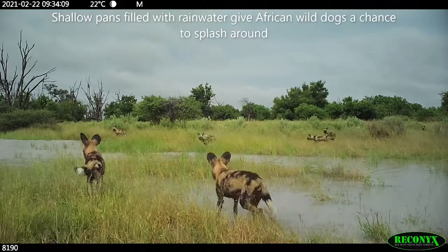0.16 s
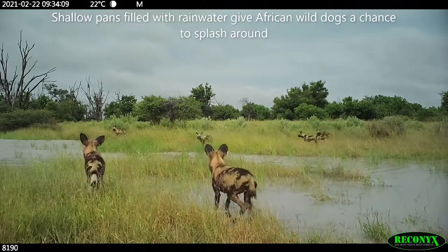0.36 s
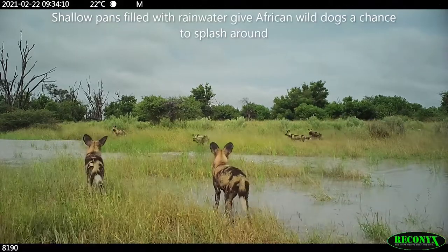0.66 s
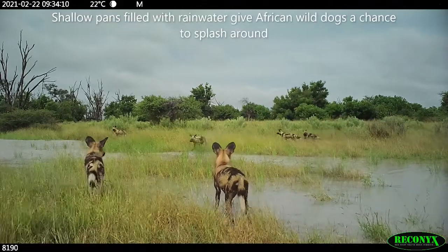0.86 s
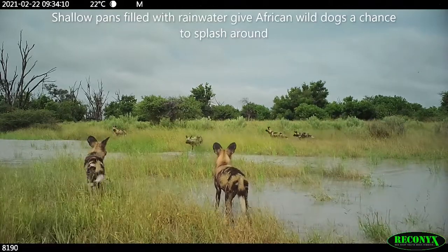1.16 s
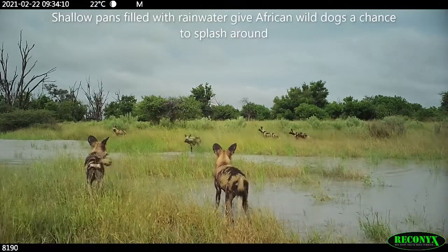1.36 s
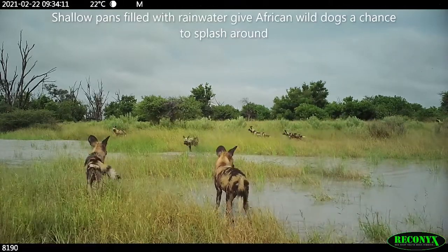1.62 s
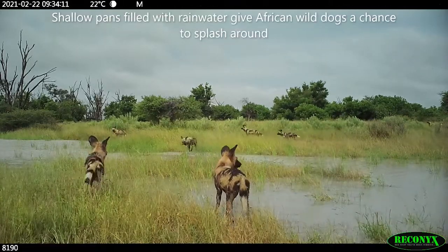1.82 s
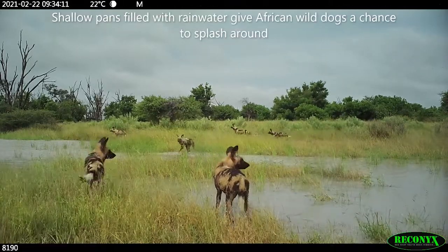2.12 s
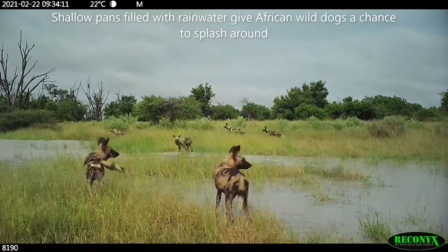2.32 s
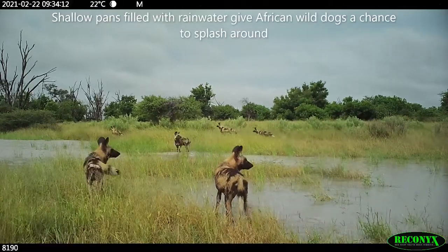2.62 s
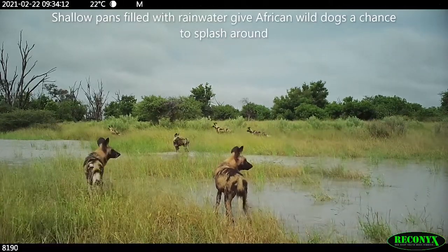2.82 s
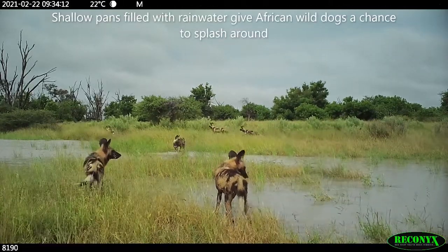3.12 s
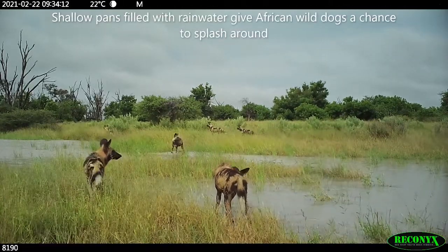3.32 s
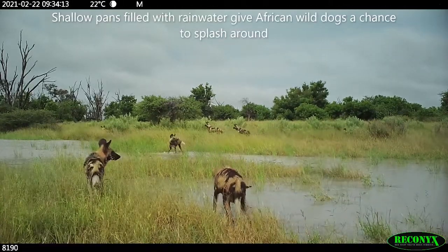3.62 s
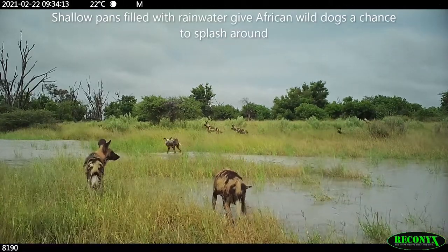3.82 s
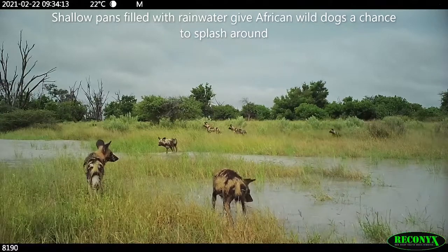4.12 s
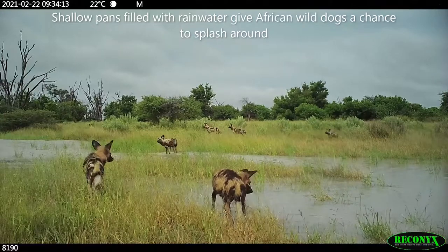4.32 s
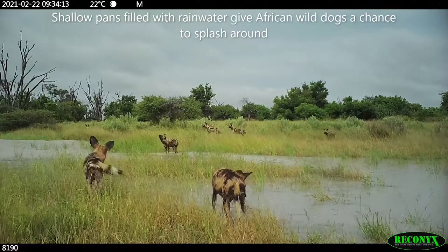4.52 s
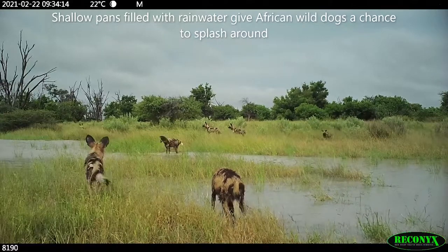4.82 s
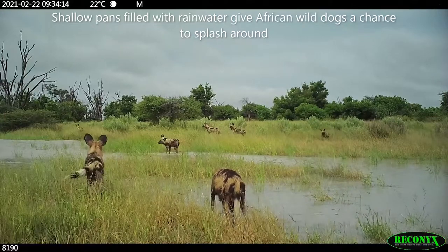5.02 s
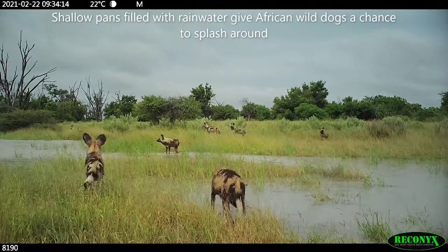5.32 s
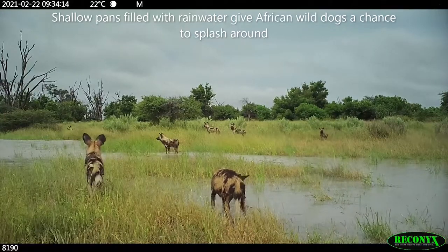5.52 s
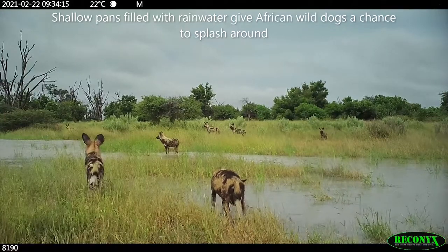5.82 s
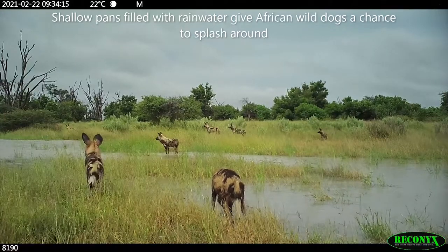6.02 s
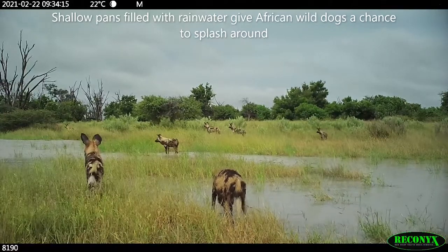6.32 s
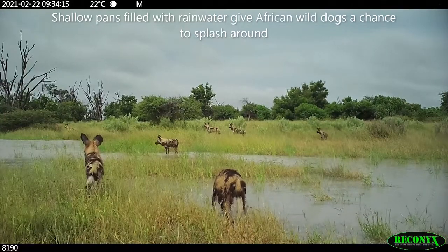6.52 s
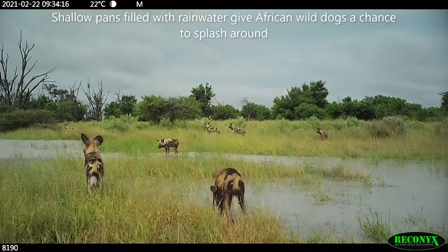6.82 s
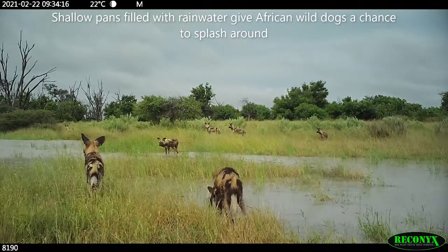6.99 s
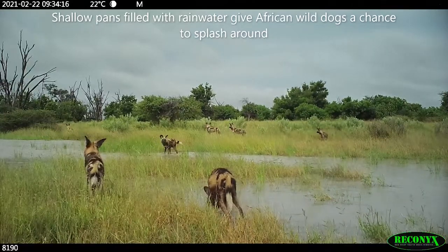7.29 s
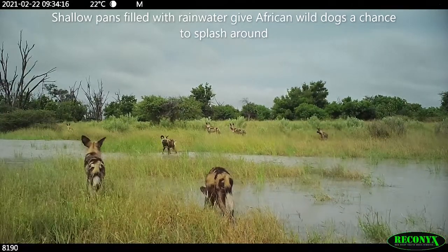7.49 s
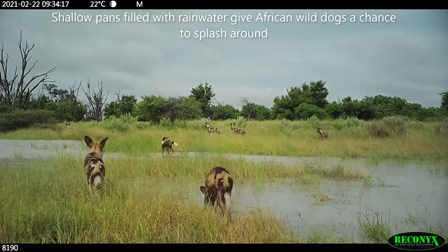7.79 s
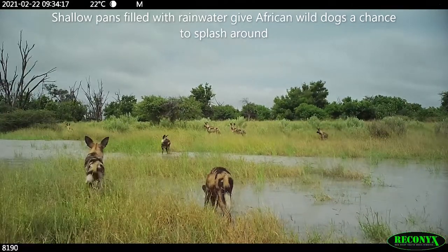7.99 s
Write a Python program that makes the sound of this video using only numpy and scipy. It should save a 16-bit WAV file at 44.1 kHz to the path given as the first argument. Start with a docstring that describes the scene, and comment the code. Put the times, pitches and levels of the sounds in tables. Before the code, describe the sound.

A wind thump hits the microphone at once, then a close, hoarse bird-like caller begins a high chip followed by a quick slur, repeated about every 0.7 seconds. Thin whistles glide faintly behind. Small splashes and snaps come from animals wading in wet grass. Calls are strongest in the first half and become fainter and more diffuse. Low breeze and grassy hiss continue; nearly everything is in the left channel.

```python
"""A gust thumps the housing of a trail camera, then a hoarse voice close by starts to repeat a chip and a slur.
The place is a flooded grassy pan; the camera's one microphone feeds the left channel.
The caller, most likely a bird, is a rough harmonic voice; thin whistles behind it are gliding near-sines.
Wind on the port is shaped noise with single pressure pulses; wading wild dogs throw bursts of spray
and ringing bubbles. A low rush follows the breeze, a high grassy hiss varies separately, over circuit hiss."""
import sys
import numpy as np
from scipy import signal
from scipy.fft import rfft, irfft, next_fast_len
from scipy.io import wavfile
from scipy.ndimage import uniform_filter1d, map_coordinates

SR = 44100
rng = np.random.default_rng(int(sys.argv[2]) if len(sys.argv) > 2 else 0)


def output_pcm(signal):
    """Save a mono or channel-first signal as 16-bit PCM at the path in sys.argv[1].

    Samples are clipped to [-1, 1] before scaling.
    """
    pcm = np.clip(np.atleast_2d(signal).T, -1, 1) * 32767
    wavfile.write(sys.argv[1], SR, np.round(pcm).astype(np.int16))


N = 359415
TIME = np.arange(N) / SR
CUTOFF_HZ = 15200  # top of the microphone channel

# Levels are relative within each table; the functions trim them. Spectra: freq_hz, level_db.
# Short arched chips of the caller: crest_s, crest_pitch_hz, level_db, roughness (0-1), fundamental_lift_db
CHIP_CALLS = [(0.175, 3000, -36, 1.0, -4), (0.83, 3136, -32.5, 0.64, -3), (1.418, 3556, -28, 0.6, -1),
              (2.063, 3285, -38, 1, 6.5), (2.698, 3450, -29.5, 0.49, 0.5), (3.394, 3320, -35.5, 0.85, 6.5),
              (4.18, 2690, -36.5, 0.54, 4.5), (4.912, 3000, -39, 0.43, 10), (5.591, 3020, -35, 0.28, -3),
              (6.166, 2900, -44, 0.6, 1), (6.704, 2950, -47.5, 0.5, 5), (7.275, 3000, -45, 0.54, 3.5),
              (7.834, 2945, -51, 0.25, 16)]
# The slur after each chip: crest_s, crest_pitch_hz, level_db, rise_s, swell_db, crest_to_sag_s, sag_pitch_hz,
# crest_to_end_s, end_pitch_hz, end_loss_db, roughness (0-1), fundamental_lift_db, tilt_db_per_octave
SLUR_CALLS = [(0.35, 2427, -40.5, 0.053, 15, .008, 2380, .016, 2350, 9, 0.6, 2.5, -0.5),
              (0.961, 3193, -28.5, .028, 26, 0.047, 2906, 0.072, 2990, 5, 0.32, 1.5, 3),
              (1.552, 3040, -29, .026, 28, .022, 2542, 0.073, 3060, -1.5, 0.4, -9.5, -4.5),
              (2.202, 3500, -24, .023, 26, 0.038, 3060, 0.07, 3250, 4.5, 0.4, 0.5, 4),
              (2.834, 2780, -27, 0.027, 30, 0.022, 2474, 0.086, 2767, 9.5, 0.45, 0.5, 2),
              (3.539, 2824, -28, 0.028, 28, 0.042, 2467, 0.09, 2510, 3, .5, 4.5, 5.5),
              (4.323, 2483, -36.5, 0.023, 27, 0.034, 2100, 0.099, 2290, 7.5, 0.55, 3, -1.5),
              (5.064, 3006, -37.5, 0.03, 14.5, .044, 2247, .086, 2870, 7.5, 0.48, 14.5, 3.5),
              (5.739, 3290, -35.5, .023, 18, 0.053, 2910, 0.092, 3240, 3.5, 0.39, -2.5, -1),
              (6.308, 3196, -38.5, 0.03, 24, 0.039, 2880, 0.09, 3080, 12.5, 0.5, 4.5, 4.5),
              (6.848, 3155, -37.5, 0.03, 26, .032, 2873, 0.078, 3050, 7, 0.27, 6, 4.5),
              (7.42, 3053, -44.5, .034, 29, 0.035, 2815, 0.064, 2870, 3, 0.4, 3, 1.5),
              (7.99, 3050, -45.5, 0.036, 22, 0.039, 2480, 0.072, 3040, 12, 0.3, 7, -2)]
# Resonances of throat and beak: freq_hz, gain_db
THROAT_GAIN = [(1200, 9.5), (2200, -6), (3100, -7), (4400, 6.5), (6200, 4.5), (7200, 6.5), (8400, -10),
               (10000, -20.5), (14000, -41)]
# Breathy rasp in the calls: freq_hz, level_db
RASP_SPECTRUM = [(1000, -2.5), (2300, -11), (3200, 0), (4500, 6.5), (6500, 13.5), (8000, 6.5),
                 (10000, -6.5), (15000, -37)]
# Share of the caller scattered by the reeds: time_s, scattered_over_direct_db
REED_SCREENING = [(0, -3), (.8, -12), (3.6, -6), (4.3, -5), (5.7, -5), (6.3, -3), (8.15, 11)]
# Thin whistles, one list per note: time_s, pitch_hz, level_db
WHISTLE_NOTES = [
    [(0.12, 9550, -64), (0.16, 9230, -45), (0.2, 8830, -59), (0.24, 8250, -56), (0.275, 7950, -40),
     (0.305, 7600, -54), (0.345, 8140, -42), (0.38, 8140, -49), (0.405, 8750, -64)],
    [(2.16, 6040, -45), (2.23, 5100, -53), (2.28, 4880, -45), (2.325, 4500, -55)],
    [(3.04, 6950, -51), (3.062, 6750, -47), (3.078, 7140, -36), (3.105, 7540, -69)],
    [(3.805, 7330, -63), (3.818, 6430, -41), (3.83, 6300, -49), (3.843, 6940, -42), (3.885, 6950, -41),
     (3.91, 7030, -38), (3.935, 7200, -57), (3.972, 7440, -53)],
    [(6.545, 5740, -65), (6.585, 5500, -51), (6.62, 5230, -50), (6.66, 4930, -54), (6.71, 4930, -52),
     (6.76, 4790, -41), (6.82, 4775, -44.5), (6.835, 5160, -51)],
    [(7.46, 5590, -58), (7.52, 5625, -43), (7.57, 5740, -48), (7.615, 5380, -48), (7.675, 5130, -57),
     (7.71, 5900, -49), (7.75, 6450, -55)],
]
# Gusts on the housing: peak_s, half_width_s, level_db
HOUSING_GUSTS = [(0.057, 0.017, -23), (0.24, .05, -42), (0.56, 0.034, -26.5), (0.8, 0.032, -34),
                 (0.955, 0.015, -30), (1.09, 0.027, -27.5), (1.2, .06, -46), (1.615, .025, -34.5),
                 (2.06, 0.081, -39), (2.52, 0.013, -50), (2.815, 0.03, -40), (3.385, 0.018, -43),
                 (3.475, 0.012, -39), (3.55, 0.017, -36.5), (3.72, 0.079, -49.5), (4.265, 0.052, -38.5),
                 (4.58, 0.013, -50), (4.76, 0.012, -41), (5.09, 0.046, -52), (5.7, .05, -43.5),
                 (5.871, 0.012, -28), (5.98, 0.034, -37.5), (6.145, 0.016, -48), (6.395, 0.017, -34),
                 (6.51, 0.025, -39.5), (6.595, 0.021, -35.5), (6.83, 0.022, -32), (6.9, 0.024, -33),
                 (7.09, 0.058, -39.5), (7.245, 0.034, -36), (7.5, .02, -42), (7.565, .025, -40.5),
                 (7.721, 0.022, -32.5), (8.078, 0.015, -33.5)]
# Single eddies that thump the port: time_s, peak_db, pitch_hz (sets the width of the pulse)
PORT_THUMPS = [(0.056, -13.5, 244), (0.067, -16, 179), (.541, -19.5, 280), (.81, -25, 150),
               (1.067, -23, 220), (1.635, -23.5, 139), (2.07, -28.5, 129), (3.475, -32, 130),
               (4.272, -33, 158), (5.871, -20, 111), (6.009, -19, 140), (6.396, -27, 220),
               (6.599, -18, 90.5), (7.711, -17.5, 121), (8.082, -28, 110)]
# Strength of the breeze: time_s, level_db
BREEZE_STRENGTH = [(0, -58.5), (.35, -55.5), (.7, -58), (1.4, -55.5), (1.65, -60.5), (2.0, -60.5),
                   (2.3, -65), (2.9, -65.5), (3.25, -62), (3.6, -62.5), (4.1, -60), (4.35, -64), (5.2, -66),
                   (5.7, -59), (6.1, -62.5), (6.9, -60.5), (7.42, -57), (8.15, -64)]
# Turbulence on the port: freq_hz, level_db
BUFFET_SPECTRUM = [(20, 8.5), (60, 4), (110, 0.5), (180, -3), (290, -11), (450, -24.5), (900, -32.5),
                   (2000, -72)]
# Steady low rumble of the air: freq_hz, level_db
RUMBLE_SPECTRUM = [(20, -3.5), (45, -1.5), (90, -5), (160, -34), (400, -39)]
# Small splashes and snaps in the wet grass: start_s, level_db
SPLASH_HITS = [(0.0189, -42), (0.034, -36), (0.41, -37), (0.478, -42.5), (0.5018, -62), (1.159, -41),
               (1.6786, -44.5), (1.722, -44), (1.9177, -43.5), (1.9659, -46), (3.1497, -44),
               (3.2354, -46.5), (5.412, -43), (6.4607, -46.5), (6.5959, -47), (6.9573, -44.5),
               (7.1288, -33), (7.1811, -42.5), (7.2555, -37), (7.5744, -45), (7.9134, -49), (8.099, -44)]
# Spray of droplets: freq_hz, level_db
SPLASH_SPECTRUM = [(800, -15), (1800, -0.5), (3500, -10.5), (6000, 4), (8500, -2), (14000, -25.5)]
# Bubbles under the paws: start_s, starting_pitch_hz, level_db
BUBBLES = [(3.233, 926, -36), (3.725, 1600, -44), (8.094, 1680, -41)]
# Low rush of the breeze: freq_hz, level_db
RUSH_SPECTRUM = [(30, -0.5), (200, -0.5), (400, 3), (800, 3), (1300, -5), (2500, -17), (5000, -24),
                 (12000, -35)]
# High hiss in the grass: freq_hz, level_db
GRASS_SPECTRUM = [(1500, -3.5), (3200, -7), (5000, -4.5), (6000, -6), (7000, 1), (8200, -10), (10000, -12),
                  (15000, -31)]
# Strength of that hiss: time_s, level_db
GRASS_STRENGTH = [(0, -53.5), (.35, -55), (.8, -61), (1.5, -62.5), (1.8, -59.5), (2.6, -60.5), (2.95, -58),
                  (3.25, -62.5), (3.7, -60), (4.0, -64), (5.5, -62), (7.0, -60), (8.15, -59)]
# Circuit hiss: freq_hz, level_db
CIRCUIT_SPECTRUM = [(20, 6.5), (70, 22.4), (140, 14.4), (240, 9), (350, 9.7), (1000, 7.4), (6000, 3.6),
                    (15000, 1.3)]


def caller():
    """One hoarse voice close by sings pairs of notes: a chip, then a slur."""
    out, rasp = np.zeros(N), coloured(RASP_SPECTRUM)
    for crest_s, hz, db, rough, lift_db in CHIP_CALLS:
        gesture = chip(crest_s, hz, db)
        add(out, *hoarse_note(*gesture, rough, lift_db, 0, rasp))
    for *settings, rough, lift_db, tilt_db in SLUR_CALLS:
        gesture = slur(*settings)
        add(out, *hoarse_note(*gesture, rough, lift_db, tilt_db, rasp))
    return out


def chip(crest_s, hz, db, rise_s=0.018, fall_s=0.024, start_share=0.54,
         attack_s=0.0135, decay_s=0.014, crest_db=2, squareness=1.66):
    """One short arch of pitch; the level falls away on both sides of the crest."""
    t = np.arange(-2.5 * attack_s, 3 * decay_s, 1 / SR)
    arch = np.exp(-(t / np.where(t < 0, rise_s, fall_s)) ** 2)
    pitch = hz * (start_share + (1 - start_share) * arch)
    away = np.abs(t) / np.where(t < 0, attack_s, decay_s)
    gain = from_db(db + crest_db) * np.exp(-away ** squareness)
    return crest_s + t, pitch, gain


def slur(crest_s, hz, db, rise_s, swell_db, sag_s, sag_hz, length_s, end_hz, loss_db, lead_in=2.3,
         recovery=0.72, swell_curve=1.5, start_share=0.42, sag_db_per_octave=9.5, release_s=0.009):
    """A soft low start sweeps up to the crest, then the pitch sags and moves on to its end value."""
    start = -lead_in * rise_s
    t = np.arange(start - 2 * release_s, length_s + 2 * release_s, 1 / SR)
    push = np.exp(-(np.minimum(t, 0) / rise_s) ** 2)
    recovery_s = recovery * max(length_s - sag_s, 1e-3)
    sag = (sag_hz - hz) * ease(t / sag_s)
    held_hz = hz + sag + (end_hz - sag_hz) * ease((t - sag_s) / recovery_s)
    pitch = held_hz * (start_share + (1 - start_share) * push)
    level_db = db - swell_db * (1 - push) ** swell_curve
    level_db += sag_db_per_octave * np.log2(held_hz / hz)
    level_db -= loss_db * np.clip(t / length_s, 0, 1)
    outside = np.maximum(start - t, 0) + np.maximum(t - length_s, 0)
    return crest_s + t, pitch, from_db(level_db - 20 * outside / release_s)


def hoarse_note(t, pitch, gain, rough, lift_db, tilt_db, rasp, jitter=0.073, wobble=0.0225, wobble_hz=110.4,
                flutter_hz=600, shimmer=0.49, rasp_share=0.68, split_db=-9, patchy_db=3.0, patchy_hz=91.3,
                softening=0.19, burr_db=1.8, burr_hz=110, resonance_share=0.15):
    """A harmonic voice whose membranes flutter irregularly and slip into period doubling."""
    size = len(t)
    unsteadiness = jitter * drift(flutter_hz, size) + wobble * drift(wobble_hz, size)
    phase = 2 * np.pi * np.cumsum(pitch * (1 + rough * unsteadiness)) / SR
    orders = np.arange(2, 13)[:, None] / 2  # harmonics 1 to 6 and the lines halfway between
    # the softer the push, the weaker the upper harmonics
    slope_db = tilt_db + softening * 20 * np.log10(gain / gain.max())
    colour_db = at_hz(THROAT_GAIN, orders * pitch) + slope_db * np.log2(orders) + lift_db * (orders == 1)
    flicker_db = patchy_db * np.array([drift(patchy_hz, size) for order in orders])
    weights = from_db(colour_db + flicker_db) * (orders * pitch < CUTOFF_HZ)
    # the halfway lines come and go with the roughness
    splitting = from_db(split_db) * rough * drift(flutter_hz, size)
    weights = weights * np.where(orders % 1 > 0, splitting, 1)
    strength = np.sqrt(np.sum(weights ** 2, axis=0) / 2)
    # the voice rings out where a harmonic meets a resonance of the throat
    ringing = (strength / np.average(strength, weights=gain ** 2)) ** resonance_share
    tone = ringing * np.sum(weights * np.sin(orders * phase), axis=0) / strength
    shimmering = np.exp(shimmer * rough * drift(flutter_hz, size))
    throb = shimmering * from_db(burr_db * drift(burr_hz, size))
    air = np.interp(t, TIME, rasp)
    voice = throb * (tone + rasp_share * rough * air)
    return t[0], gain * voice / np.sqrt(np.average(voice ** 2, weights=gain ** 2))


def whistles(waver=0.0044, waver_hz=152.3, overtone_db=-29, flicker_db=2.5, flicker_hz=41.1):
    """Nearly pure gliding tones with a faint octave."""
    out = np.zeros(N)
    for rows in WHISTLE_NOTES:
        t, pitch, gain = contour(rows, fade_s=0.013)
        phase = 2 * np.pi * np.cumsum(pitch * (1 + waver * drift(waver_hz, len(t)))) / SR
        tone = np.sin(phase) + from_db(overtone_db) * np.sin(2 * phase)
        flicker = from_db(flicker_db * drift(flicker_hz, len(t)))
        add(out, t[0], np.sqrt(2) * gain * tone * flicker)
    return out


def contour(rows, fade_s):
    """Time, smooth pitch and gain of one note; it fades 20 dB per fade_s beyond its ends."""
    s, hz, db = np.transpose(rows)
    t = np.arange(s.min() - 2 * fade_s, s.max() + 2 * fade_s, 1 / SR)
    outside = np.maximum(s.min() - t, 0) + np.maximum(t - s.max(), 0)
    pitch = uniform_filter1d(np.interp(t, s, hz), size=400, mode="nearest")
    return t, pitch, from_db(np.interp(t, s, db) - 20 * outside / fade_s)


def scatter(x, scattered_db, stems_t60=0.053, bushes_db=-12, bushes_t60=0.69,
            reeds_db=-9, reeds_t60=0.6, reeds_hz=6700, reeds_width_hz=1400):
    """Near stems break up the tones; far bushes return a thin diffuse tail, and the reeds a high shimmer."""
    reed_band = signal.iirpeak(reeds_hz, reeds_hz / reeds_width_hz, fs=SR)
    shimmer = signal.lfilter(*reed_band, echoes(x, reeds_t60))
    stems = echoes(x, stems_t60)
    bushes = from_db(bushes_db) * echoes(x, bushes_t60)
    cloud = stems + bushes + from_db(reeds_db) * shimmer
    share = from_db(scattered_db)
    return (x + share * cloud) / np.hypot(1, share)


def echoes(x, t60, build_up_s=0.0003):
    """A dense, dying cloud of reflections with unit energy."""
    t = np.arange(SR // 2) / SR
    tail = rng.standard_normal(len(t)) * from_db(-60 * t / t60) * (1 - np.exp(-t / build_up_s))
    return signal.fftconvolve(x, tail / np.linalg.norm(tail))[:N]


def wind():
    """Air striking the port: turbulence that swells in gusts, a low rumble and single thumps."""
    return buffeting() + from_db(-49) * coloured(RUMBLE_SPECTRUM) + thumps()


def buffeting(buffet_db=3.5, breeze_db=12, lumpy_db=2, ceiling_db=-20):
    """Lumpy turbulence on the port follows the breeze and swells in gusts."""
    strength_db, = in_time(BREEZE_STRENGTH)
    gusts = np.zeros(N)
    for s, width_s, db in HOUSING_GUSTS:
        gusts += from_db(db) / (1 + ((TIME - s) / width_s) ** 4) ** 0.68
    eddies = coloured(BUFFET_SPECTRUM)
    # even out the noise over 34 ms so that gusts, breeze and slow lumps set its level
    eddies = eddies / np.sqrt(uniform_filter1d(eddies ** 2, size=1500) + 1e-9)
    force = from_db(buffet_db) * np.hypot(gusts, from_db(strength_db + breeze_db))
    force = force / np.hypot(1, force / from_db(ceiling_db))  # the strongest gusts level off
    return force * from_db(lumpy_db * drift(30, N)) * eddies


def thumps(suddenness=1.22):
    """Each eddy is a brief suction between two pressure swells, steeper on its way in."""
    out = np.zeros(N)
    for s, db, hz in PORT_THUMPS:
        u = np.abs(TIME - s) * np.pi * hz * np.where(TIME < s, suddenness, 1)
        out -= from_db(db) * (1 - u ** 2) / (1 + u ** 2) ** 3
    return out


def wading(splash_db=-4, spray_t60=0.12, attack_s=0.00065, droplets_db=4.5, plop_t60=0.061, rise=2.5):
    """A paw throws a short spray of droplets; a trapped bubble rings and rises in pitch."""
    spray, plops = np.zeros(N), np.zeros(N)
    t = np.arange(SR // 5) / SR
    swell = 1 - np.exp(-t / attack_s)
    for s, db in SPLASH_HITS:
        add(spray, s, swell * from_db(db + splash_db - 60 * t / spray_t60))
    for s, hz, db in BUBBLES:
        ring = np.sin(2 * np.pi * hz * t * (1 + rise * t))
        add(plops, s, swell * from_db(db - 60 * t / plop_t60) * ring)
    droplets = from_db(droplets_db * drift(400, N)) * coloured(SPLASH_SPECTRUM)
    return spray * droplets + plops


def grass(rush_db=7, hiss_db=6, grain_db=2, sway_db=1.86):
    """A low rush follows the breeze; a high grassy hiss swells and fades separately."""
    strength_db, = in_time(BREEZE_STRENGTH)
    hiss_strength_db, = in_time(GRASS_STRENGTH)
    rush = from_db(strength_db + rush_db + sway_db * drift(12, N)) * coloured(RUSH_SPECTRUM)
    hiss = from_db(hiss_strength_db + hiss_db + grain_db * drift(250, N)) * coloured(GRASS_SPECTRUM)
    return rush + hiss


def scene():
    """Everything reaches the left channel; the right gets only a trace of the wind."""
    screening_db, = in_time(REED_SCREENING)
    voices = scatter(caller(), screening_db) + scatter(whistles(), scattered_db=-6)
    port_wind = wind()
    left = voices + port_wind + wading() + grass()
    return np.array([left, from_db(-36) * port_wind])


def record(dry, hiss_db=-59, offset=-0.031, settle_s=1.13):
    """Circuit hiss in both channels, an offset that settles after switch-on, and a steep top cut."""
    hiss = from_db(hiss_db) * np.array([coloured(CIRCUIT_SPECTRUM), coloured(CIRCUIT_SPECTRUM)])
    bias = offset * (1 - np.exp(-TIME / settle_s))
    top_cut = signal.ellip(12, 0.1, 80, CUTOFF_HZ, fs=SR, output="sos")
    return signal.sosfilt(top_cut, dry + hiss + bias)


def coloured(spectrum):
    """Noise of a given spectrum, rms 1."""
    size = next_fast_len(N)
    gain = from_db(at_hz(spectrum, np.arange(size // 2 + 1) * SR / size))
    return rms_one(irfft(rfft(rng.standard_normal(size)) * gain, size)[:N])


def drift(rate_hz, size):
    """Smooth random wander around 0, with a spread of about 1."""
    step = SR / (2 * rate_hz)
    knots = rng.standard_normal(int(size / step) + 4)
    return map_coordinates(knots, [np.arange(size) / step + 1], order=2, mode="nearest")


def at_hz(points, hz):
    """Read a spectrum on a log-frequency axis."""
    freqs, levels = np.transpose(points)
    return np.interp(np.log(np.maximum(hz, 1)), np.log(freqs), levels)


def in_time(rows):
    """Each column of a curve at every sample."""
    s, *columns = np.transpose(rows)
    return [np.interp(TIME, s, c) for c in columns]


def ease(u):
    """A smooth step from 0 to 1."""
    return np.sin(np.pi / 2 * np.clip(u, 0, 1)) ** 2


def from_db(db):
    """Decibels to gain."""
    return 10 ** (np.asarray(db) / 20)


def rms_one(x):
    """Scale to unit power."""
    return x / np.sqrt(np.mean(np.abs(x) ** 2) + 1e-20)


def add(out, start_s, sound):
    """Mix a sound in at a time."""
    i = max(int(start_s * SR), 0)
    out[i:i + len(sound)] += sound[:max(N - i, 0)]


dry = scene()
out = record(dry)
output_pcm(out)
```